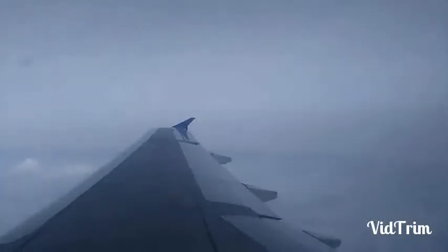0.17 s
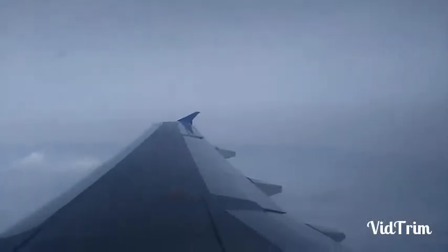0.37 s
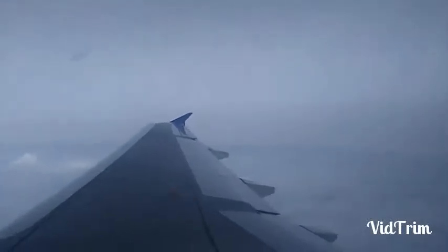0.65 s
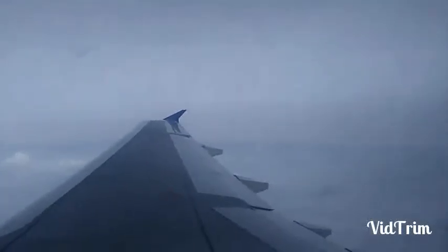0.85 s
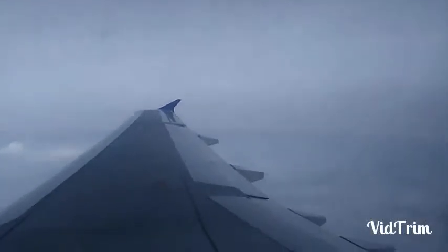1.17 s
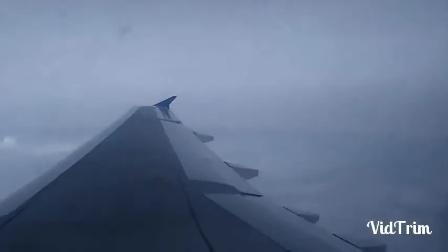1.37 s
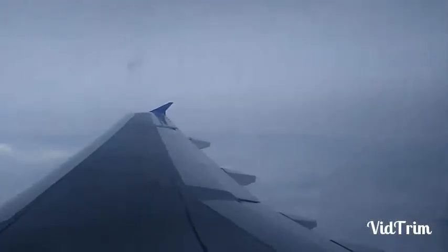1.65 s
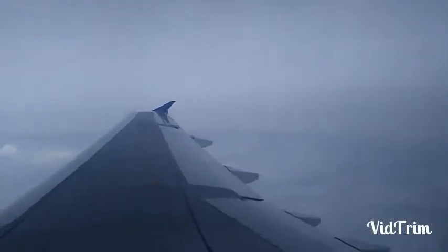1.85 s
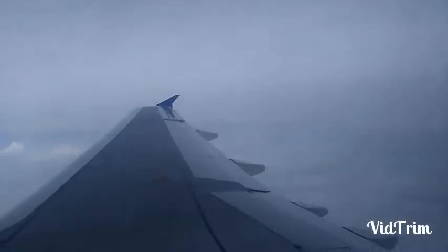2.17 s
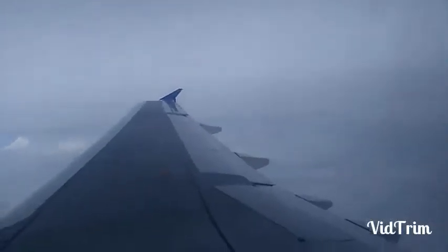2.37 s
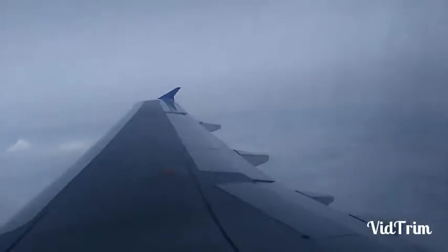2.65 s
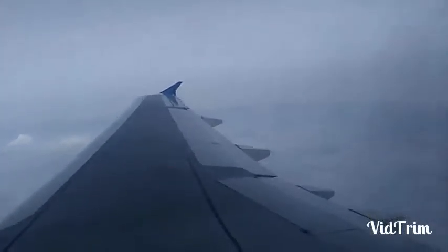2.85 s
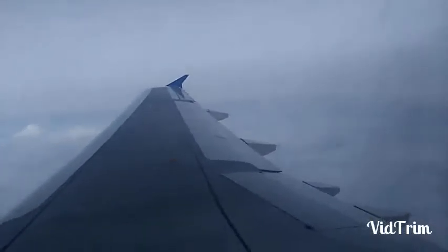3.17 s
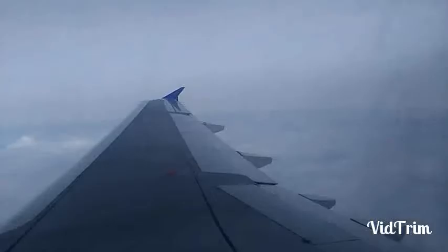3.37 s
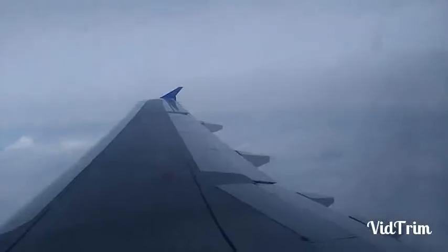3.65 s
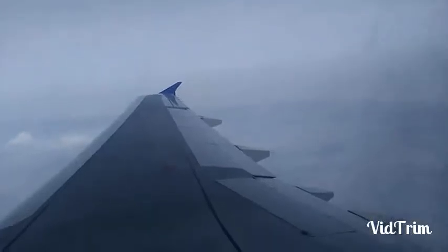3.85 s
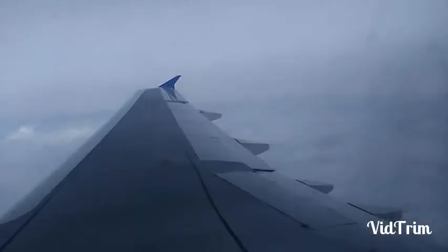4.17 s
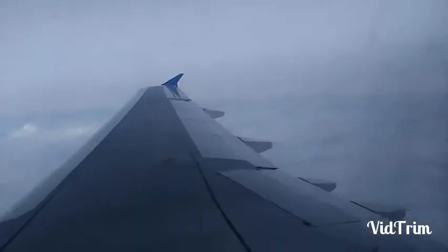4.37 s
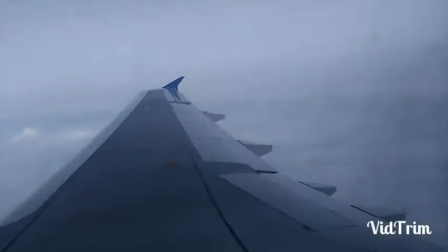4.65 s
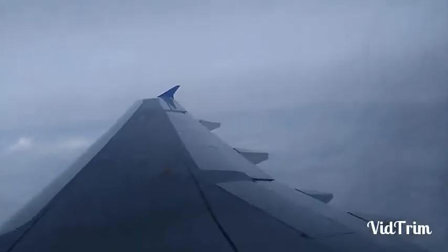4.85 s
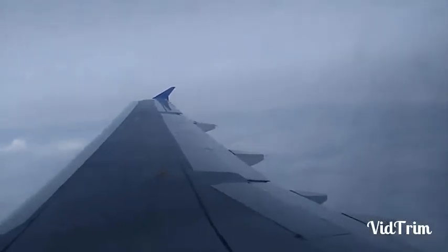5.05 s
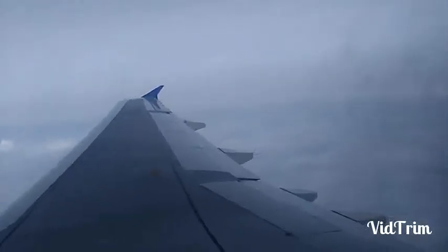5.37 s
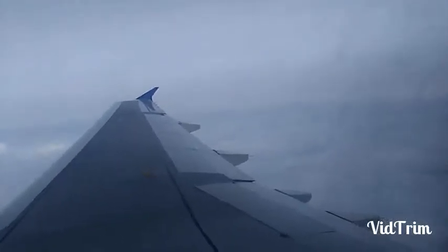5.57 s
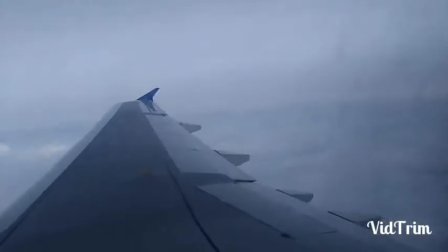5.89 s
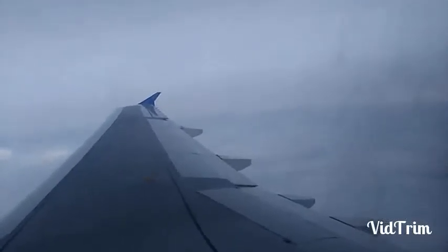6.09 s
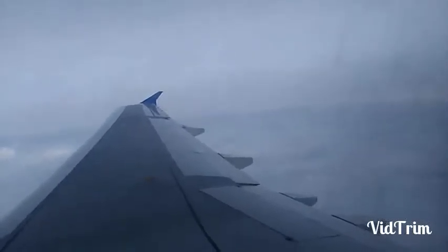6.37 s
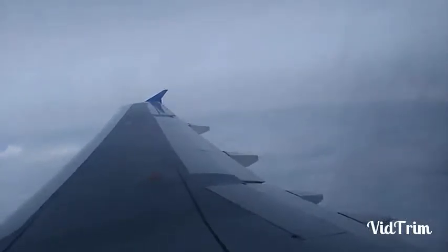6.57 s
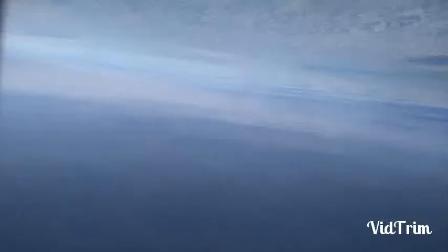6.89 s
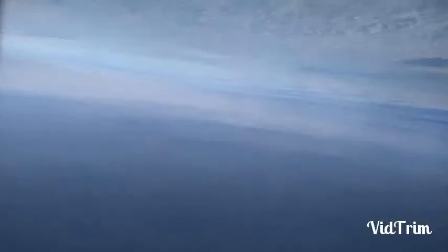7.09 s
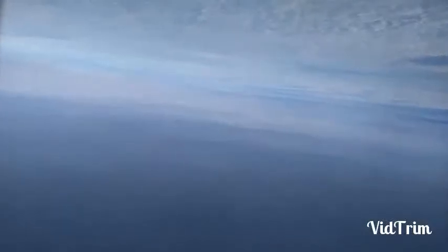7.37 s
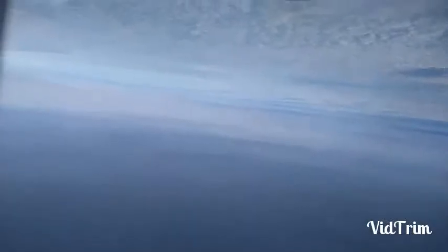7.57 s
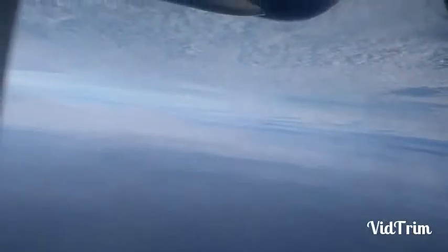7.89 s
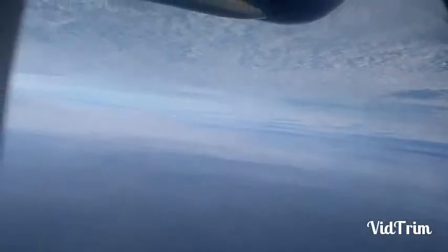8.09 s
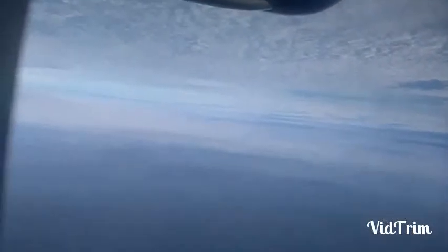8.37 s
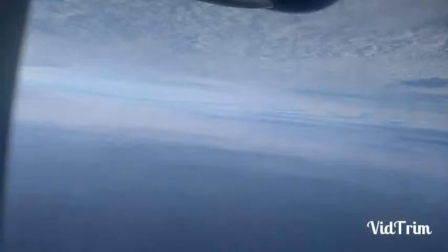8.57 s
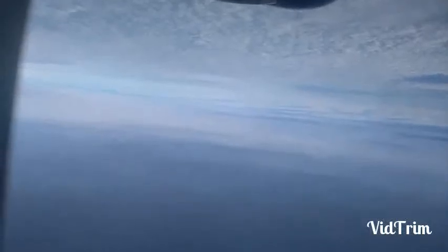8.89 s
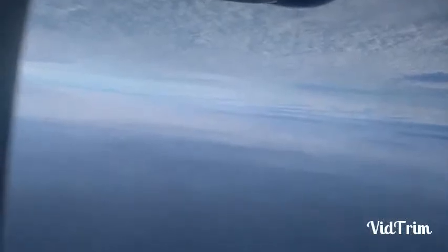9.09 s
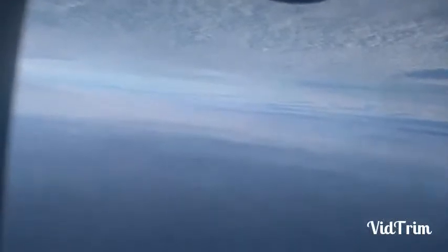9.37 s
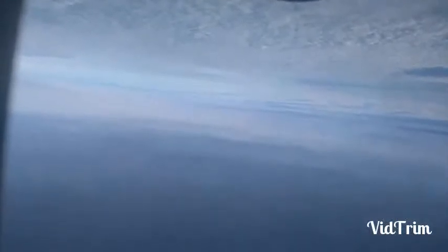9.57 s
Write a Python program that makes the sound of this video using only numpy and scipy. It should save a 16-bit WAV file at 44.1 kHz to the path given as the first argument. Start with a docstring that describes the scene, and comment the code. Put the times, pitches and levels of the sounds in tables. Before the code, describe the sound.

From 0 s, an airliner cabin in cruise, heard close to a window: dense low rumble shuddering with turbulence, a muffled rush of air above it, and little high treble. Engine hums around 70, 140 and 225 Hz waver in and out, with a faint thin ventilation whine and a hollow breathy duct note. Small low jolts come irregularly. Around 2 to 3 s the microphone slides, the tone colour shifts with a breathy whoosh and very faint rustles. Hiss swells gently near 4 s; the deepest hum grows strong around 5.3 to 6 s. At 6.8 s a short click ends everything. Silence until 7.3 s. Then the drone enters abruptly, louder, brighter and hissier, with firm hums and clearer whine. Around 8.7 to 9 s it sinks markedly quieter and duller as the microphone draws back, continuing until an abrupt stop at 9.7 s.

```python
"""Airliner cabin in cruise at a window seat: two stretches with a silent pause between; the first ends in a click.
Turbulence rumbles in the hull (noise in three bands); the slipstream rushes in window and wall panel
resonances (noise shaped frame by frame). Engine shafts and ventilation hum and whine (wavering sines),
an air duct breathes (narrow-band noise) and faint rustles pass (bright noise bursts).
The colour shifts as the microphone moves by the window."""
import sys
import numpy as np
from scipy import signal
from scipy.fft import rfft, irfft, next_fast_len
from scipy.io import wavfile
from scipy.ndimage import uniform_filter1d, map_coordinates

SR = 44100
rng = np.random.default_rng(int(sys.argv[2]) if len(sys.argv) > 2 else 0)


def file_out(sig):
    """Save sig as 16-bit WAV at sys.argv[1]."""
    # one column per channel
    cols = np.atleast_2d(sig).T
    # limit, then scale
    lim = np.clip(cols, -1, 1)
    pcm = np.round(lim * 32767).astype(np.int16)
    wavfile.write(sys.argv[1], SR, pcm)


N = 429074
TIME = np.arange(N) / SR
FIRST_S, SECOND_S = (0, 6.774), (7.333, 9.73)
CUTOFF_HZ = 14450

# band limits: hull below ROAR_TOP_HZ, slipstream above
BOOM_TOP_HZ, THRUM_TOP_HZ, ROAR_TOP_HZ, RUSH_TOP_HZ, HISS_TOP_HZ = 85, 200, 480, 1100, 4500

# resonances wander: time between turns, share of width, lift
WANDER_S, WANDER_SHARE, WANDER_DB = 0.12, 0.09, 0.9
# grid spacing of the random patches in the air noise
PATCH_S, PATCH_OCTAVES = 0.06, 0.09

# rotating parts and other hums
FAN_SHAFT_HZ, CORE_SHAFT_HZ, VENT_FAN_HZ, VENT_WHINE_HZ = 70.0, 225.4, 519.1, 1557.3
LOW_HUM_HZ, HIGH_HUM_HZ = 124.9, 157.8
SPEED_UP = 1.0046   # pitch factor of the hums in the second stretch
HUM_WAVER_DB, HUM_WANDER_RAD, WHINE_WAVER_DB = 0.9, 0.18, 3
DUCT_HZ, DUCT_WIDTH_HZ, DUCT_DB = 370, 47, -38

# microphone path, along the window: (time [s], place [index])
MOVE_FIRST = [(0, 0.08), (2.05, 0.08), (2.35, 0.65), (2.65, 1), (2.95, 1.73), (3.25, 1.42), (4.0, 1.66),
              (6.77, 2.6)]
# microphone path, back from the wall: (time [s], place [index])
MOVE_SECOND = [(7.33, 0.056), (8.66, 0.065), (8.75, 0.53), (8.85, 0.87), (8.98, 1), (9.73, 0.99)]

# hull rumble spectrum before band levelling: (frequency [Hz], relative density [dB per Hz])
RUMBLE = [(15, -34.5), (28, -27.5), (36, -25), (45, -2.5), (70, -3.5), (105, 4), (150, 2), (200, -2.5),
          (280, -5), (360, -10), (450, -13), (600, -19)]
# turbulence jolts, before band levelling: (time [s], length [s], lift [dB])
JOLTS = [(0.664, 0.038, 14), (1.3, 0.029, 11.5), (1.712, 0.031, 11), (4.89, 0.015, 18), (5.091, 0.029, 11),
         (6.154, 0.046, 9), (8.99, 0.015, 8), (9.355, 0.027, 3)]
# calm hull level, a row per place: (boom [dB], thrum [dB], roar [dB])
HULL_FIRST = [(-28, -21.5, -21), (-30, -21, -28), (-24.5, -23.5, -25.5)]
HULL_SECOND = [(-25, -20, -21), (-37, -28, -31.5)]
# hull surges and lulls: (time [s], length [s], boom lift [dB], thrum lift [dB], roar lift [dB])
SURGES = [(0.26, 0.046, 8, -1.5, 0), (0.548, 0.12, 1, 8, 0.5), (0.76, 0.091, -5.5, -8.5, -5.5),
          (0.927, 0.08, 4.5, 4, 0.5), (1.14, 0.091, -4.5, -7.5, -0.5), (1.348, 0.19, 0, 4, -1),
          (1.95, 0.063, -3, -4, -11), (2.14, 0.17, -1.5, 5.5, 0), (2.485, 0.11, 5, -13, 4),
          (2.8, 0.54, 1, 2.5, 2.5), (3.296, 0.21, 0, 1.5, -1), (3.714, 0.08, 4, 5, 2.5),
          (4.06, 0.066, 10.5, -10.5, 0.5), (4.367, 0.17, 1, -0.5, 3.5), (5.015, 0.13, -2.5, 4.5, 5),
          (5.298, 0.12, 4, 3, 1.5), (5.565, 0.1, -2, -9.5, -2), (5.739, 0.045, 8, 9.5, -1),
          (5.836, 0.048, -7, 0, -4.5), (5.926, 0.076, -10, 2.5, 1.5), (6.202, 0.12, -2, 5, 1),
          (6.35, 0.088, 0.5, -2, 4), (6.64, 0.15, 0, 9, 2), (7.95, 0.08, 7, 1, 1), (8.17, 0.059, -2, 5, -1),
          (8.536, 0.067, 2, 2.5, 3), (8.827, 0.11, 3, -4, -6.5), (9.003, 0.062, 0, 2, 3.5),
          (9.12, 0.07, 1, 2, 1.5), (9.207, 0.06, 4, 0, 1.5), (9.35, 0.08, 0, 4, 1), (9.51, 0.048, 8, -2, 1),
          (9.616, 0.065, -11, -8, -1)]

# slipstream spectrum before band levelling: (frequency [Hz], relative density at place 0, 1, .. [dB per Hz])
AIR_FIRST = [(450, -55, -57, -55.5), (605, -57, -55, -58), (742, -62.5, -55, -59),
             (1142, -73.5, -78.5, -75.5), (1450, -81, -81, -75), (2410, -83, -83.5, -84.5),
             (3270, -94, -90.5, -92), (5320, -97, -101.4, -100.5), (5900, -104.4, -102, -101.5),
             (7900, -106.4, -104.5, -105.5), (9450, -114.8, -114.1, -114.7),
             (14000, -124.6, -118.7, -125.3)]
AIR_SECOND = [(455, -51, -61.5), (710, -61, -68.5), (1146, -68, -82.5), (1450, -70.5, -77.5),
              (2380, -74.5, -75.5), (3160, -81, -83.5), (4540, -84.5, -94), (5800, -90.5, -99.5),
              (8000, -97.5, -95.5), (10100, -103.8, -102.9), (14000, -114.3, -112.8)]
# window and panel resonances, before band levelling:
# (centre [Hz], width [Hz], lift [dB]) at place 0, repeated for place 1, ..
PANELS_FIRST = [(1002, 200, 7.8, 1001, 130, 12, 950, 230, 8.4),
                (1240, 55, 4.7, 1290, 210, 9.1, 1215, 160, 6),
                (1570, 230, 5.9, 1482, 100, 6.3, 1352, 100, 8.7),
                (2660, 280, 2, 2900, 276, 1.5, 2690, 300, 4.8),
                (3610, 300, 7.6, 3950, 450, 4.5, 3980, 270, 3.7),
                (4250, 460, 3.8, 4400, 450, 5.8, 4190, 470, 8)]
PANELS_SECOND = [(1315, 250, 5.8, 1284, 290, 15.3), (1790, 163, 1.4, 1750, 190, 5),
                 (2200, 190, 4.7, 2220, 307, 4.7), (4080, 240, 7, 4080, 360, 7.6),
                 (5060, 670, 6.7, 4950, 400, 3.5)]
# airflow level, a row per place: (rush [dB], hiss [dB], airy top [dB])
FLOW_FIRST = [(-32.5, -44, -65), (-30.5, -44.5, -68.5), (-31.5, -41.5, -65.5)]
FLOW_SECOND = [(-29.5, -32.5, -52.5), (-39.5, -47.5, -59.5)]
# gliding breathy resonance, before band levelling: (time [s], centre [Hz], width [Hz], lift [dB])
GLIDE = [(0, 2090, 260, 5.5), (1.1, 1960, 224, 9.5), (1.75, 1990, 210, 9), (1.95, 1990, 257, 12.5),
         (2.3, 2100, 330, 12.5), (2.48, 2110, 419, 9), (2.65, 2320, 300, 13.5), (2.95, 2340, 240, 0.5),
         (6.77, 2340, 221, 2.5), (7.3, 2330, 219.4, -2)]
# narrow whooshes, before band levelling: (time [s], length [s], centre [Hz], width [Hz], lift [dB])
WHOOSHES = [(0.868, 0.21, 1077, 130, 4.5), (0.948, 0.32, 4350, 500, 0), (2.3, .16, 2380, 180, 7),
            (3.521, .12, 2590, 200, 7.5), (4.2, 0.19, 1295, 181, 4.5), (4.48, 0.12, 1350, 300, 4),
            (5.42, 0.11, 1314, 250, 4), (5.8, 1.8, 7370, 694, 3.5), (5.304, 1.2, 2605, 70, 1),
            (6.15, .075, 2630, 170, 14)]
# one swell of hiss and whines, first stretch: (time [s], length [s], lift [dB])
HISS_SWELL = (3.95, 1.9, 2.0)

# hums, first stretch: (frequency [Hz], level at place 0 [dB], level at place 2 [dB])
HUMS_FIRST = [(2 * FAN_SHAFT_HZ, -29.5, -39), (VENT_FAN_HZ, -43, -40.5)]
# hums, second stretch: (frequency before SPEED_UP [Hz], level close to wall [dB], level back from it [dB])
HUMS_SECOND = [(FAN_SHAFT_HZ, -29.5, -36), (LOW_HUM_HZ, -24, -38.5), (2 * FAN_SHAFT_HZ, -30, -33.5),
               (HIGH_HUM_HZ, -22.5, -31), (CORE_SHAFT_HZ, -25.5, -39.5), (VENT_FAN_HZ, -31.5, -41.5),
               (VENT_WHINE_HZ, -44, -58.5)]
# engine core hum, first stretch: (time [s], level [dB])
CORE_LEVEL = [(0, -27), (.6, -28.5), (.95, -23.5), (1.7, -25), (2.8, -26.5), (3.4, -31), (4.7, -32),
              (5, -27), (5.6, -31.5), (5.85, -26), (6.77, -25)]
# fan shaft hum, first stretch: (time [s], level [dB])
SHAFT_LEVEL = [(0, -32.5), (.28, -24.5), (.75, -36), (1.5, -29), (2, -37.5), (4.2, -40), (5.3, -22),
               (5.7, -19.5), (6.2, -28.5), (6.6, -24.5)]
# ventilation whine, first stretch: (time [s], level [dB])
WHINE_LEVEL = [(0, -50), (.3, -56), (.58, -50), (1.02, -48), (1.38, -59.5), (1.65, -50.5), (1.92, -52.5),
               (2.15, -61.5), (2.65, -64.5), (3.1, -59), (4.15, -63), (4.45, -52), (5, -57.5),
               (6.77, -59.5)]
# faint machinery whines: (frequency [Hz], level relative to hiss [dB])
WHINES = [(1194.5, -13.5), (3129, -30.5)]

# faint rustles near the microphone: (time [s], length [s], rms at peak [dB])
RUSTLES = [(1.951, 0.022, -64), (2.3, .12, -71), (2.735, 0.11, -65), (2.855, 0.05, -65.5),
           (2.908, .035, -68), (2.953, .03, -69), (3.042, 0.034, -71.5), (6.287, 0.032, -68),
           (6.556, 0.24, -70)]
# rustle spectrum: (frequency [Hz], relative density [dB per Hz])
RUSTLE_COLOUR = [(3000, -20), (4800, -2.5), (6800, 2.5), (9500, -10.5), (14000, -13.5)]


def from_db(db):
    """Decibels to gain."""
    return 10 ** (np.asarray(db) / 20)


def in_time(rows, t=TIME):
    """Columns of a time curve, joined by straight lines."""
    s, *columns = np.transpose(rows)
    return [np.interp(t, s, c) for c in columns]


def at_hz(rows, hz):
    """Columns of a spectrum, joined on a log-frequency axis."""
    points, *columns = np.transpose(rows)
    return [np.interp(np.log(hz + 1e-3), np.log(points), c) for c in columns]


def at_place(rows, move):
    """Columns of a per-place table, followed along the microphone path."""
    place, = in_time(move)
    return [np.interp(place, np.arange(len(rows)), c) for c in np.transpose(rows)]


def filtered(x, gain_at):
    """Weights each frequency of x by gain_at(Hz)."""
    size = next_fast_len(N + SR // 2)
    hz = np.arange(size // 2 + 1) * SR / size
    return irfft(rfft(x, size) * gain_at(hz), size)[:N]


def split(x, hz, order=12):
    """Parts of x below and above hz; they add up to x."""
    low = filtered(x, lambda f: 1 / (1 + (f / hz) ** order))
    return low, x - low


def steady(x, seconds):
    """Noise levelled to about rms 1 by a running mean square, smoothed twice."""
    size = max(int(seconds * SR), 2)
    power = uniform_filter1d(uniform_filter1d(x * x, size), size)
    return x / np.sqrt(power + 1e-18)


def drift(rate_hz, slowest_hz=1e-3, size=8192):
    """Slow noise of spread 1, low-passed at rate_hz, without swings below slowest_hz."""
    hz = np.arange(size // 2 + 1) * SR / N
    low_pass = 1 / (1 + (hz / rate_hz) ** 2)
    high_pass = 1 - 1 / (1 + (hz / slowest_hz) ** 10)
    slow = irfft(rfft(rng.standard_normal(size)) * low_pass * high_pass)
    return np.interp(np.arange(N) * size / N, np.arange(size), slow / slow.std())


def shudder(depth_db):
    """Gain that jolts several times a second, without slow swings."""
    return from_db(depth_db * drift(14, slowest_hz=5))


def swell(t, s, length_s):
    """Gaussian rise and fall around time s, 1 on top."""
    return np.exp(-2 * ((t - s) / length_s) ** 2)


def bell(hz, centre_hz, width_hz):
    """Resonance shape, 1 on top, half at the edges of its width."""
    return 1 / (1 + (2 * (hz - centre_hz) / width_hz) ** 2)


def during(span_s, edge_s=0.00019):
    """Gate, on inside the span, with quick linear edges."""
    start_s, end_s = span_s
    return np.clip(np.minimum(TIME - start_s, end_s - TIME) / edge_s, 0, 1)


def hull(calm_db, shudder_db):
    """Turbulence shakes the fuselage: boom, thrum and roar shudder, surge and lull; jolts hit the lower two."""
    noise = filtered(rng.standard_normal(N),
                     lambda f: from_db(at_hz(RUMBLE, f)[0]) / np.sqrt(1 + (f / ROAR_TOP_HZ) ** 20))
    jolts = from_db(sum(lift_db * swell(TIME, s, length_s) for s, length_s, lift_db in JOLTS))
    low, roar = split(noise, THRUM_TOP_HZ)
    boom, thrum = split(low * jolts, BOOM_TOP_HZ)
    surge_db = sum(np.outer(lifts_db, swell(TIME, s, length_s)) for s, length_s, *lifts_db in SURGES)
    out = 0
    for part, depth_db, level_db, lift_db in zip((boom, thrum, roar), shudder_db, calm_db, surge_db):
        out = out + steady(part * shudder(depth_db), 0.18) * from_db(level_db + lift_db)
    return out


def wander(t):
    """Random path, one new turn every WANDER_S."""
    turns = rng.standard_normal(size=128)
    return np.interp(t / WANDER_S, np.arange(len(turns)), turns)


def patches(hz, t):
    """Smooth random field over pitch and time, spread about 1: each eddy stirs its own narrow band."""
    rows = np.log2(np.maximum(hz, ROAR_TOP_HZ) / ROAR_TOP_HZ) / PATCH_OCTAVES
    field = rng.standard_normal(size=(128, 512))
    grid = np.broadcast_arrays(rows, t / PATCH_S)
    return map_coordinates(field, grid, order=1, mode="mirror") * np.sqrt(2)


def slipstream(air, panels, move, patchy_db, size=2048):
    """Boundary-layer noise through window and panels; resonances slide as the microphone moves."""
    overlap = size - size // 4
    hz, t, frames = signal.stft(rng.standard_normal(N), SR, nperseg=size, noverlap=overlap)
    spectra_db = np.transpose(at_hz(air, hz))
    places = np.arange(spectra_db.shape[1])
    place = np.clip(in_time(move, t)[0], 0, places[-1])
    nearness = np.maximum(1 - np.abs(place - places[:, None]), 0)   # blend of the two nearest places
    hz = hz[:, None]
    patch_depth_db = patchy_db / (1 + (hz / HISS_TOP_HZ) ** 4)
    level_db = spectra_db @ nearness + patch_depth_db * patches(hz, t)
    for resonance in panels:
        centre_hz, width_hz, lift_db = np.reshape(resonance, (len(places), -1)).T @ nearness
        lift_db = lift_db + WANDER_DB * wander(t)
        centre_hz = centre_hz + WANDER_SHARE * width_hz * wander(t)
        level_db += lift_db * bell(hz, centre_hz, width_hz)
    centre_hz, width_hz, lift_db = in_time(GLIDE, t)
    level_db += lift_db * bell(hz, centre_hz, width_hz)
    for s, length_s, centre_hz, width_hz, lift_db in WHOOSHES:
        level_db += lift_db * bell(hz, centre_hz, width_hz) * swell(t, s, length_s)
    above_roar = np.sqrt(1 - 1 / (1 + (hz / ROAR_TOP_HZ) ** 20))
    frames = frames * from_db(level_db) * above_roar * np.sqrt(SR / 2)
    return signal.istft(frames, SR, nperseg=size, noverlap=overlap)[1][:N]


def gusting(air, flow_db, flutter_db=(1.05, 0.65, 0.7)):
    """Rush, hiss and airy top follow the airflow strength; eddies make each flutter."""
    rush, rest = split(air, RUSH_TOP_HZ)
    hiss, top = split(rest, HISS_TOP_HZ)
    out = 0
    for part, depth_db, level_db in zip((rush, hiss, top), flutter_db, flow_db):
        out = out + steady(part * shudder(depth_db), 0.2) * from_db(level_db)
    return out


def hum(hz, level_db, waver_db=HUM_WAVER_DB):
    """A rotating part gives a nearly pure tone, wavering in strength and phase; level is rms."""
    phase = 2 * np.pi * (hz * TIME + rng.random()) + HUM_WANDER_RAD * drift(15.0)
    return np.sqrt(2) * np.sin(phase) * from_db(level_db + waver_db * drift(6))


def whines(hiss_db, wander_rad):
    """Thin tones of unsteady phase that come through the wall along with the hiss."""
    out = 0
    for hz, relative_db in WHINES:
        phase = 2 * np.pi * hz * TIME + wander_rad * drift(5.8)
        out = out + np.sqrt(2) * from_db(hiss_db + relative_db) * np.sin(phase)
    return out


def duct():
    """Ventilation air sounds one narrow resonance: a hollow, breathy note of constant level."""
    noise = filtered(rng.standard_normal(N), lambda f: bell(f, DUCT_HZ, DUCT_WIDTH_HZ))
    return from_db(DUCT_DB) * steady(noise, 0.5)


def rustles(grain_db=2.5):
    """Short soft brushes of bright, finely grained friction noise."""
    noise = filtered(rng.standard_normal(N), lambda f: from_db(at_hz(RUSTLE_COLOUR, f)[0]))
    noise = noise * from_db(grain_db * drift(70))
    strokes = sum(from_db(db) * swell(TIME, s, length_s) for s, length_s, db in RUSTLES)
    return strokes * noise / noise.std()


def stop_click(s, level_db, rise_s):
    """One-sided pulse: climbs exponentially up to time s, then drops to nothing in one step."""
    return from_db(level_db) * np.exp(-np.abs(TIME - s) / rise_s) * (TIME < s)


def along_window():
    """First stretch: the microphone slides along the window while engine tones swell and fade."""
    place, = in_time(MOVE_FIRST)
    rush_db, hiss_db, top_db = at_place(FLOW_FIRST, MOVE_FIRST)
    s, length_s, lift_db = HISS_SWELL
    hiss_db = hiss_db + lift_db * swell(TIME, s, length_s)
    out = hull(at_place(HULL_FIRST, MOVE_FIRST), shudder_db=(1.5, 2.5, 1.9))
    air = slipstream(AIR_FIRST, PANELS_FIRST, MOVE_FIRST, patchy_db=2.5)
    out += gusting(air, (rush_db, hiss_db, top_db), flutter_db=(1.3, 0.65, 0.7))
    for hz, first_db, last_db in HUMS_FIRST:
        out += hum(hz, np.interp(place, (0, 2), (first_db, last_db)))
    out += hum(CORE_SHAFT_HZ, in_time(CORE_LEVEL)[0])
    out += hum(FAN_SHAFT_HZ, in_time(SHAFT_LEVEL)[0])
    out += hum(VENT_WHINE_HZ, in_time(WHINE_LEVEL)[0], WHINE_WAVER_DB)
    return out + whines(hiss_db, wander_rad=3.3) + rustles() + duct()


def by_wall():
    """Second stretch: loud and bright close to the wall; hull, air and tones sink as the microphone draws back."""
    place, = in_time(MOVE_SECOND)
    rush_db, hiss_db, top_db = at_place(FLOW_SECOND, MOVE_SECOND)
    out = hull(at_place(HULL_SECOND, MOVE_SECOND), shudder_db=(1.7, 1.4, 1.7))
    air = slipstream(AIR_SECOND, PANELS_SECOND, MOVE_SECOND, patchy_db=1.0)
    out += gusting(air, (rush_db, hiss_db, top_db))
    for hz, close_db, back_db in HUMS_SECOND:
        out += hum(hz * SPEED_UP, np.interp(place, (0, 1), (close_db, back_db)))
    return out + whines(hiss_db, wander_rad=1.6) + duct()


def scene():
    """Two stretches of the same cabin; the first stops with a click."""
    first = along_window() * during(FIRST_S)
    second = by_wall() * during(SECOND_S)
    click = stop_click(FIRST_S[1], level_db=-13.0, rise_s=0.0011)
    return (first + second + click)[None]


def record(dry):
    """Steep elliptic low-pass at CUTOFF_HZ."""
    low_pass = signal.ellip(10, 0.1, 80, CUTOFF_HZ, fs=SR, output="sos")   # ripple, stopband [dB]
    return signal.sosfilt(low_pass, dry)


dry = scene()
out = record(dry)
file_out(out)
```